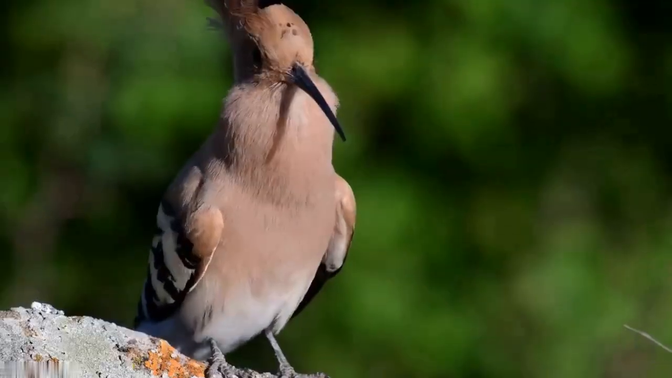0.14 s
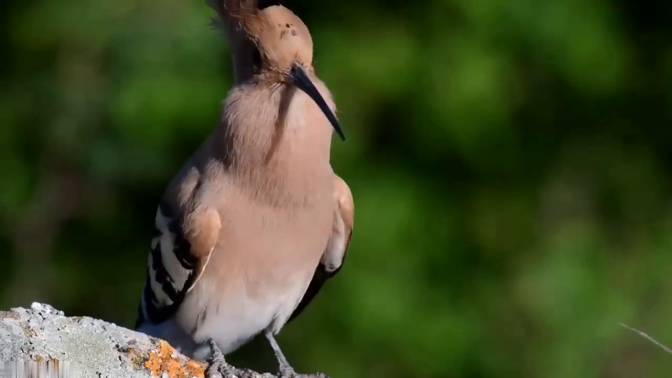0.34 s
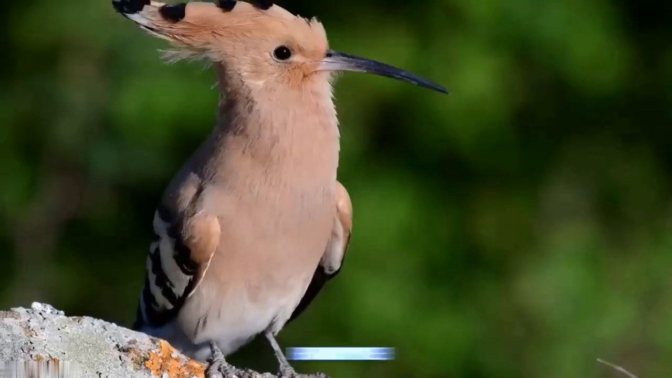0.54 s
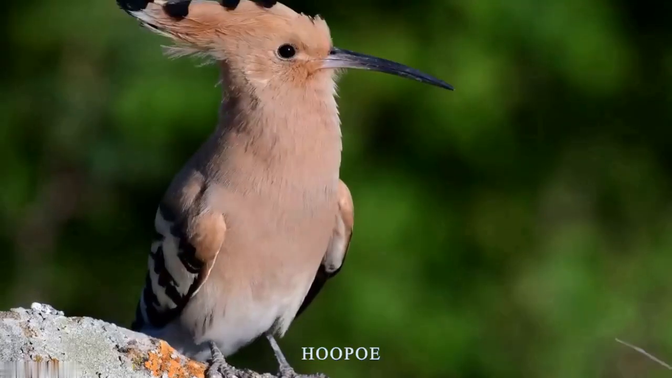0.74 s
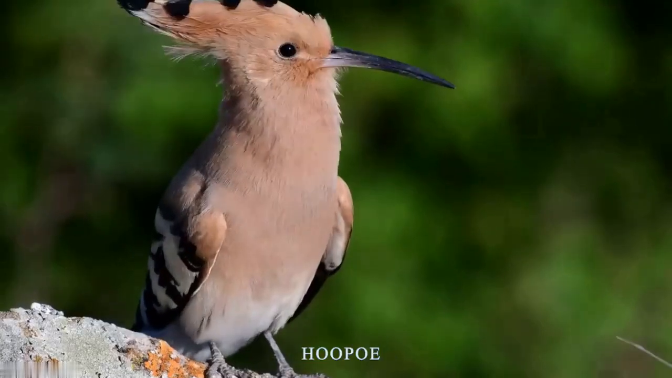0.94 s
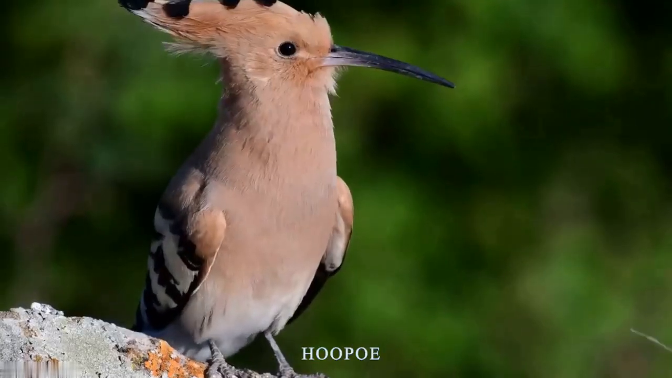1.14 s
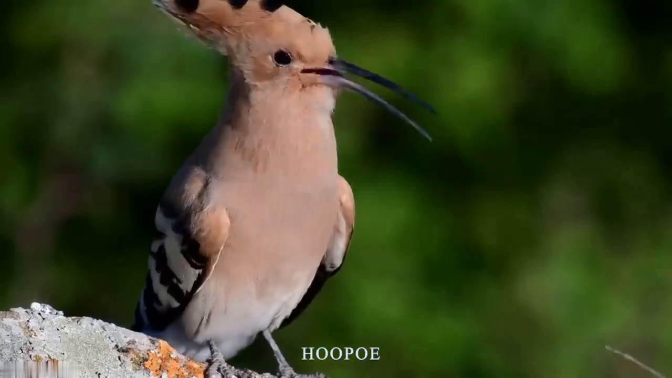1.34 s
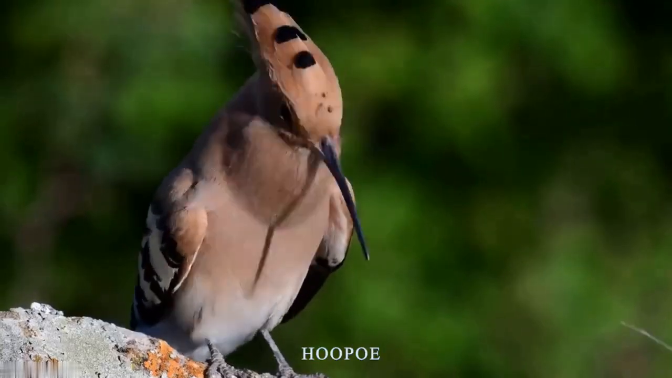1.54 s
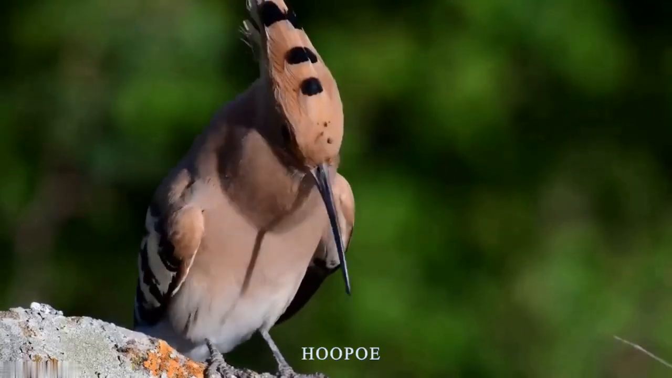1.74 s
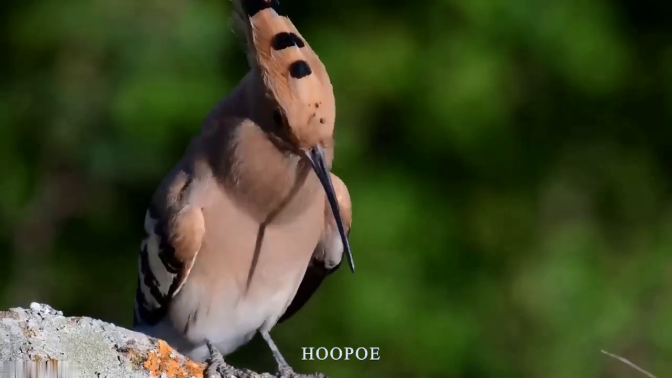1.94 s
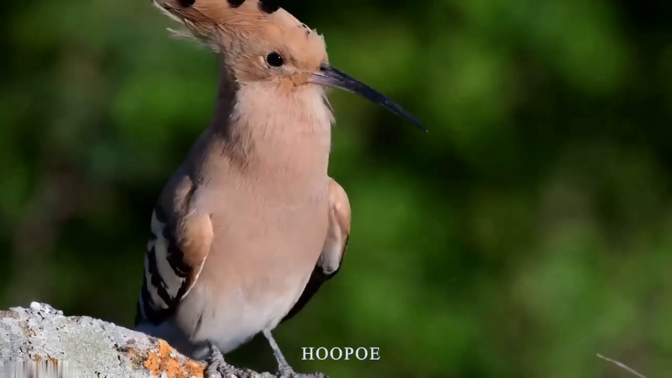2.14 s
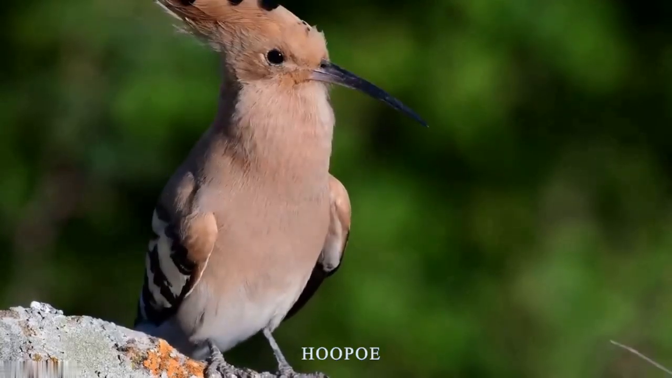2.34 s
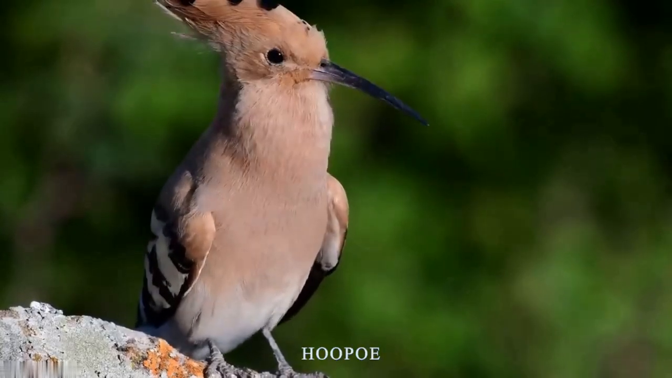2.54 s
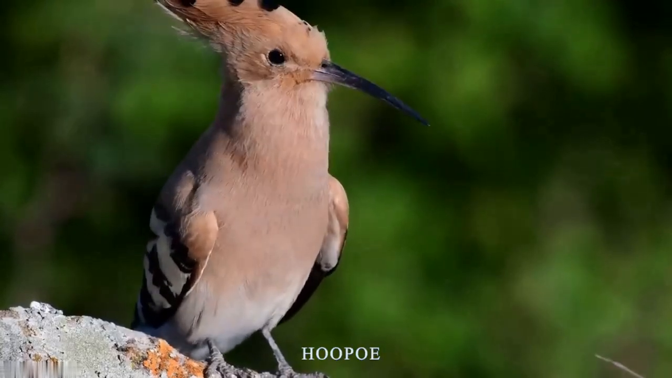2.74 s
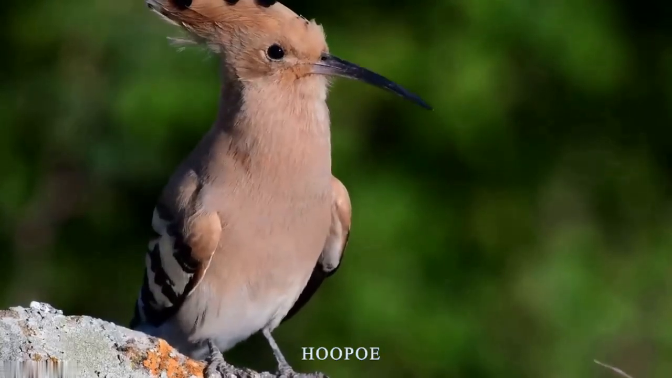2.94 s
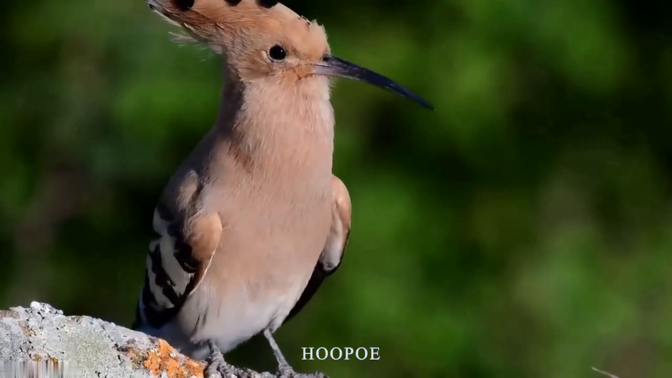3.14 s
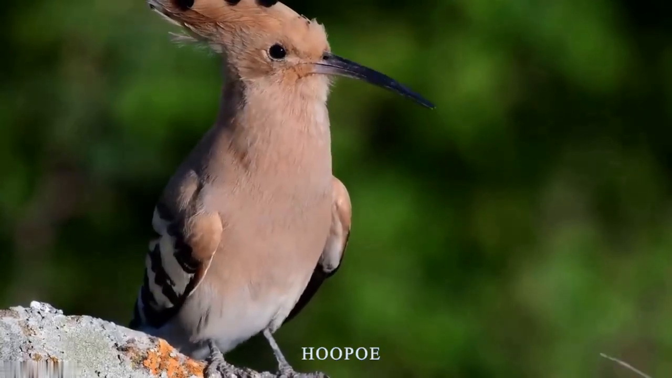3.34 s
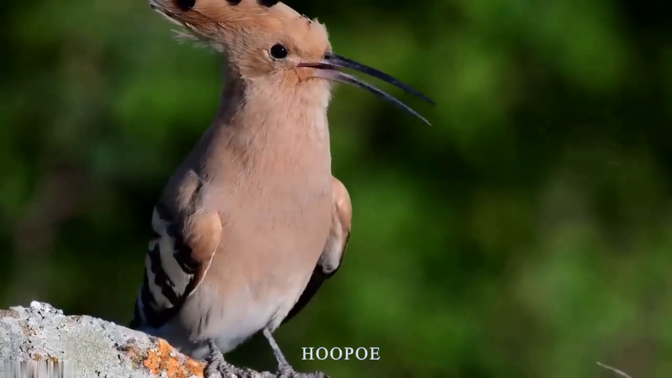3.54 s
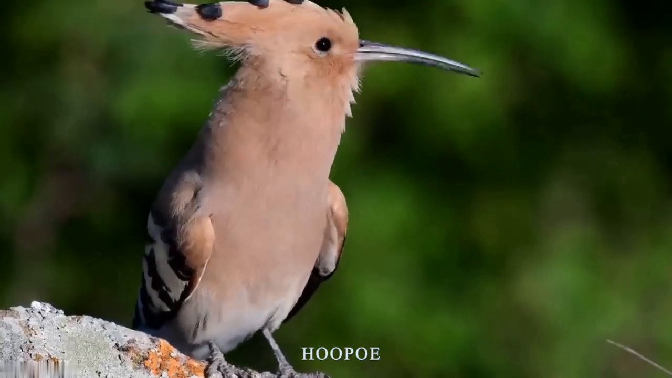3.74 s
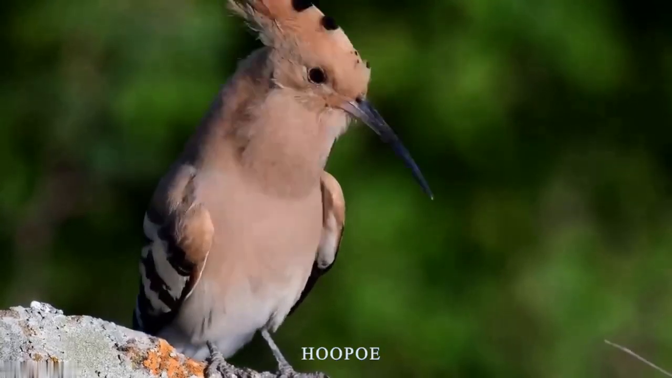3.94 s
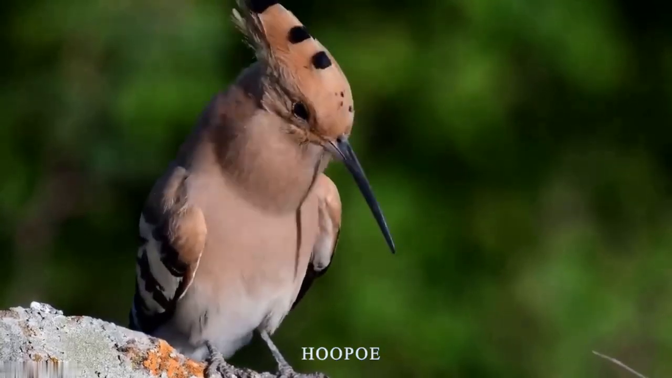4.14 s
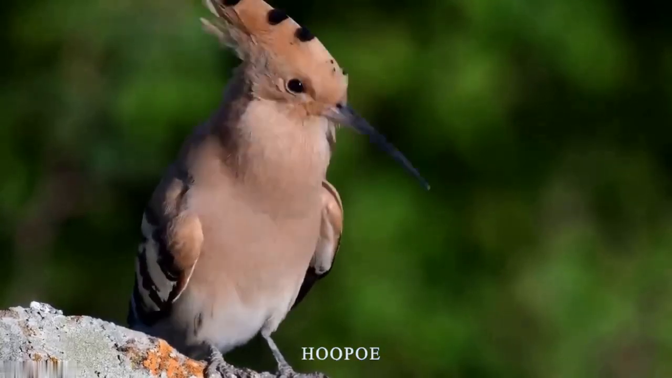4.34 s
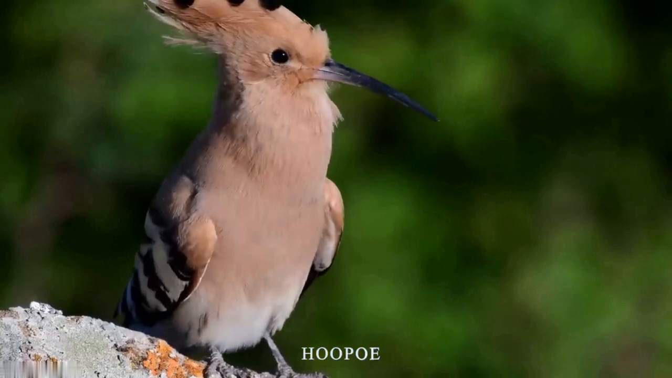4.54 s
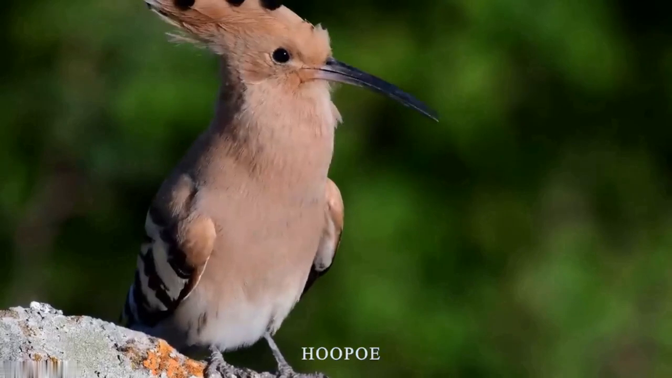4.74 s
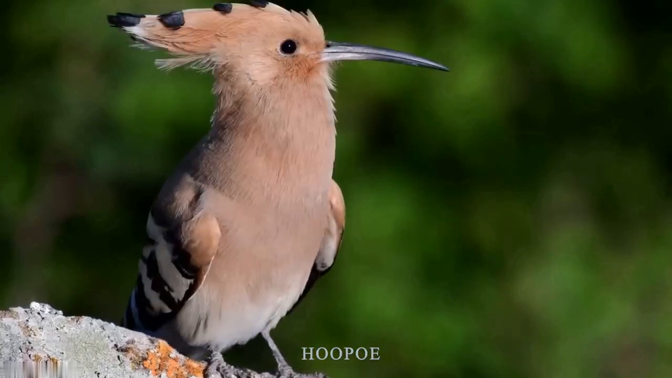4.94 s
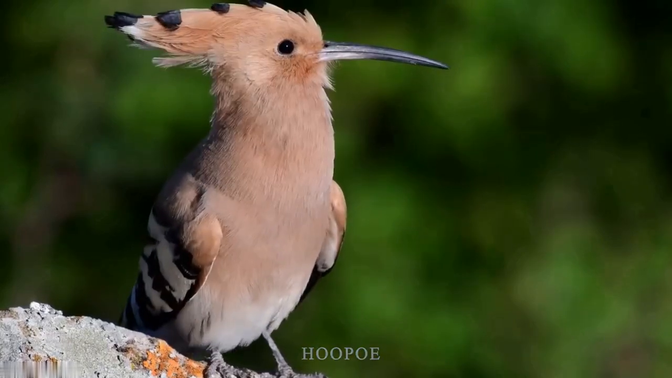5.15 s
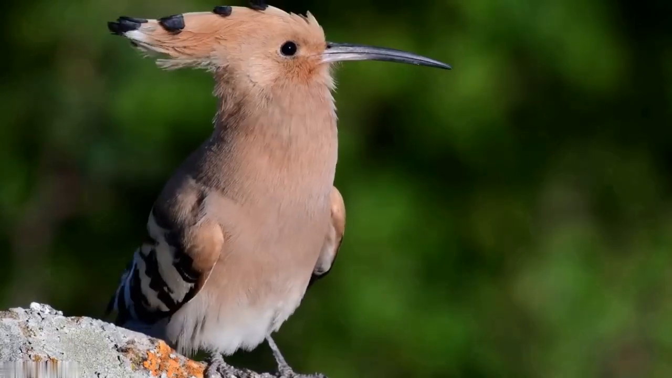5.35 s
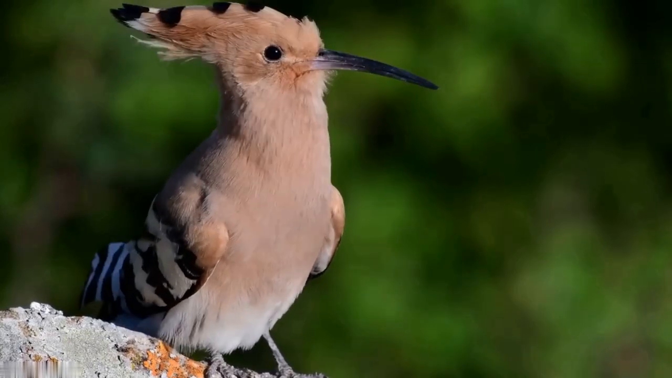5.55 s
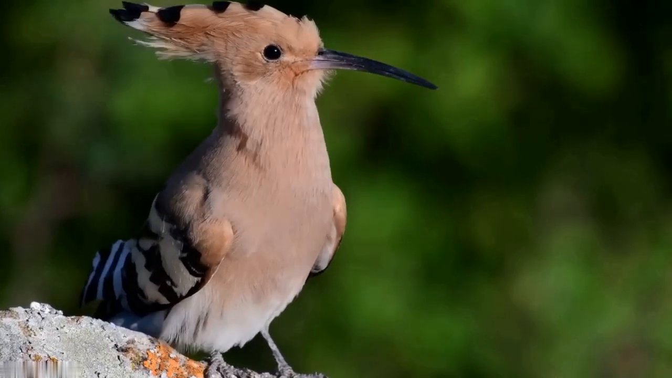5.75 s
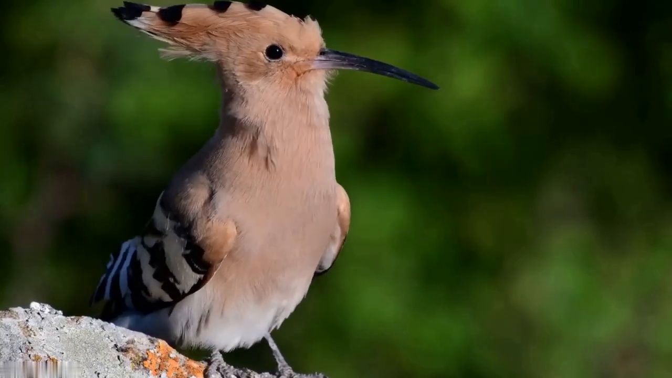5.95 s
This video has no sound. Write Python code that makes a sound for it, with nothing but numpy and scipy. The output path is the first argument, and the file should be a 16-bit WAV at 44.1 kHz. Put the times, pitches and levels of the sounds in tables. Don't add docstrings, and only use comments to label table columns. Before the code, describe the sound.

Quiet open country with scattered trees, heard in stereo. The tail of a hoot opens, then two triplets of soft hollow hoopoe calls follow, slightly right of centre, with very faint echoes. Thin cricket chirps repeat about three or four times a second throughout. A small bird chips weakly and another pipes far off. Just before the second triplet, handling noises tick, knock and creak near the microphone; low wind swells slightly towards the end.

```python
import sys
import numpy as np
from scipy import signal
from scipy.io import wavfile
from scipy.ndimage import uniform_filter1d

SR = 44100
rng = np.random.default_rng(int(sys.argv[2]) if len(sys.argv) > 2 else 0)


def to_wav(sig):
    pcm = np.clip(np.atleast_2d(sig), -1, 1) * 32767
    pcm = np.round(pcm).astype(np.int16)
    wavfile.write(sys.argv[1], SR, pcm.T)


def gain_from_db(level_db):
    decades = np.asarray(level_db, float) / 20
    return 10 ** decades


N = 268833
LEAD = 8820


def evened(x):
    return x / np.sqrt(np.mean(x ** 2) + 1e-20)


def read(points, hz):
    f, value = np.transpose(points)
    return np.interp(np.log(hz + 1), np.log(f + 1), value)


def add(mix, s, sound, pan_db=0., lag=0):
    for side, late, db in ((0, lag, pan_db / 2), (1, 0, -pan_db / 2)):
        part = mix[side, LEAD + round(s * SR) + late:][:len(sound)]
        part += gain_from_db(db) * sound[:len(part)]


def tone(hz):
    return np.sqrt(2) * np.sin(2 * np.pi * np.cumsum(hz) / SR)


def clock(ms):
    return np.arange(0, ms, 1000 / SR)


def band(x, low_hz, high_hz):
    return signal.sosfilt(signal.butter(N=3, Wn=[low_hz, high_hz], btype="band", fs=SR, output="sos"), x)


# multiple of the pitch, level in dB.
OVERTONES = [
    (2, -39),
    (3, -45.5),
]
GROW_DB = 4


def hoot(ms, db, early_hz, middle_hz, late_hz, swell, closing):
    t = clock(ms + 28) - 28
    end_hz = late_hz - 14 + min(late_hz - middle_hz, 0)
    hz = np.interp(t / ms, [.25, .6, .9, 1.0], [early_hz, middle_hz, late_hz, end_hz])
    hz = uniform_filter1d(hz, size=300) - 48 * np.exp(-np.maximum(t, -7) / 8)
    rise = 1 - np.exp(-(np.maximum(t + 14, 0) / (swell * 1.98)) ** 2.6)
    rise = rise + gain_from_db(-36.0) * np.exp(np.minimum(t, 0) / 14) * (1 - rise)
    fall = abs(1 - np.clip(1 - (ms - t) / closing, 0, 1) ** 2.53) ** 1.56
    level = rise * fall * gain_from_db(GROW_DB * (t / ms - 0.75))
    octave = level ** 0.3 * (1 + .8 * np.exp(-((ms - 14 - t) / 11) ** 2))
    third = rise ** .5 * np.clip((ms - t) / 35 - .3, 0, 1)
    over = sum(gain_from_db(o) * tone(k * hz) * shape for (k, o), shape in zip(OVERTONES, (octave, third)))
    over = over * gain_from_db(2.5 * np.interp(t, np.linspace(0, ms, 8), rng.standard_normal(8)))
    return gain_from_db(db) * (level * tone(hz) + over * np.clip(np.minimum(t, ms - 4 - t) / 7, 0, 1))


# start in seconds, length in ms, peak level in dB, pitch in Hz, early-to-late slide in Hz.
HOOTS = [
    (1.717, 98, -26, 661.4, -29),
    (1.913, 108, -25, 669.7, 12.5),
    (2.125, 104, -25, 667, 26),
    (3.988, 71.2, -29.5, 679.3, 6.5),
    (4.182, 104, -26.5, 654.2, -5),
    (4.391, 102, -27, 656, 14.5),
]
EARLIER = (-.0925, 101, -25, 664, 22)
# start in seconds, length in ms, level in dB, first Hz, last Hz.
CRACKS = [
    (4.056, 14.6, -36, 743, 734),
    (4.065, 21, -38, 708, 651),
]
ARCH_HZ = 4.3
SWELL_MS, SWELL_BY_LENGTH = 18.6, 0.85
OPEN_MS, CLOSING_SHARE = 54, 0.83


def hoopoe():
    out = np.zeros((2, N + LEAD))
    for s, ms, db, hz, slide_hz in [EARLIER, *HOOTS]:
        ends_hz = hz - ARCH_HZ
        swell = SWELL_MS * (ms / 100) ** SWELL_BY_LENGTH
        closing = CLOSING_SHARE * (ms - OPEN_MS)
        call = hoot(ms, db, ends_hz - slide_hz / 2, hz, ends_hz + slide_hz / 2, swell, closing)
        add(out, s - .028, call, -3.0, lag=1)
    for s, ms, db, from_hz, to_hz in CRACKS:
        hz = np.interp(clock(ms), [0, ms], [from_hz, to_hz])
        crack = tone(hz) + gain_from_db(-24.5) * tone(2 * hz)
        add(out, s, gain_from_db(db) * np.hanning(len(hz)) * crack, -1.2, lag=1)
    return out


# place from 0 to 1, length in ms, level in dB, Hz from the wing pitch.
STROKES = [
    (0, 12, -4.5, -86),
    (.262, 19, -0.5, -20),
    (.615, 19.5, -0.5, 6),
    (1, 19, -1, 7),
]


def chirp(s, span_ms, db, swell_db, pan_db, wing_hz, count=4):
    return [(s + place * span_ms / 1000, ms, db + step_db + swell_db * (place - .6), wing_hz + hz, pan_db)
            for place, ms, step_db, hz in STROKES[:count]]


# start in seconds, first to last stroke in ms, level in dB,
# swell in dB, left-right difference in dB.
NEAR_CHIRPS = [(0.118, 90, -55.5, 2.5, -10.5), (0.405, 88, -58.5, 3.5, -7), (.770, 91, -52.5, 1, -6),
               (1.081, 90, -59, 5, -6), (1.384, 90, -57, 0.5, -7), (1.667, 92, -55.5, -3, -5.5),
               (1.969, 92, -58, 2.5, -4), (2.261, 91, -54.5, 7, -5), (2.544, 88, -51, 0, -5),
               (2.822, 96, -52.5, 1, -6.5), (3.102, 89, -49, 3, -8), (3.377, 91, -49, -0.5, -8),
               (3.646, 88, -54.5, 2.5, -6.5), (3.912, 90, -52, 0, -7), (4.192, 89, -55, 0, -7.5),
               (4.479, 93, -62, 0.5, -10.5), (4.753, 91, -59, 14, -5), (5.047, 88, -48.5, 3, -6.5),
               (5.323, 93, -51, 1, -6.5), (5.61, 91, -51.5, 5, -8.5), (5.915, 92, -52.5, 0.5, -8)]
# start in seconds, ms for four strokes, level in dB, strokes.
FAR_CHIRPS = [(-.070, 87, -62, 4), (.176, 87, -61, 4), (.687, 210, -69, 4), (.918, 88, -64, 4),
              (1.233, 88, -68.5, 4), (1.452, 86, -65.5, 4), (1.948, 87, -69, 3), (2.172, 94, -66, 3),
              (2.458, 87, -65.5, 4), (2.695, 87, -64.5, 4), (2.965, 88, -64, 4), (3.200, 89, -65, 4),
              (3.470, 140, -69, 4), (3.730, 97, -75, 4), (3.955, 86, -72, 4), (4.408, 87, -67, 4),
              (4.704, 76, -67, 4), (4.934, 86, -68.5, 3), (5.238, 86, -61.5, 4), (5.484, 88, -64, 3),
              (5.705, 86, -62, 4)]
NEAR_HZ, FAR_HZ, FAR_PAN_DB, FAR_SWELL_DB = 4689, 4515, -5, 1.5
SCRAPE_DB = -21


def crickets():
    strokes = [row for near in NEAR_CHIRPS for row in chirp(*near, NEAR_HZ)]
    for s, pace_ms, db, many in FAR_CHIRPS:
        strokes += chirp(s, pace_ms, db, FAR_SWELL_DB, FAR_PAN_DB, FAR_HZ, count=round(many))
    out = np.zeros((2, N + LEAD))
    chance = rng.standard_normal((len(strokes), 24))
    rasps = gain_from_db(SCRAPE_DB) * evened(band(rng.standard_normal((len(strokes), 1500)), 5200, 8600))
    for (s, ms, db, hz, pan), c, rasp in zip(strokes, chance, rasps):
        u = (clock(ms + 4.6) + .01) / (ms + 5.6)
        sag_hz = 105 - 520 * u ** 2.8
        level_flutter = np.interp(u, np.linspace(0, 1, 12), c[:12])
        pitch_flutter = np.interp(u, np.linspace(0, 1, 12), c[12:])
        level = np.sin(np.pi * u ** 0.83) * gain_from_db(db - 0.7 + 1.8 * level_flutter)
        ring = tone(hz + sag_hz + 35 * pitch_flutter)
        add(out, s - .0025, level * (ring + rasp[:len(u)]), pan, lag=1)
    return out


# start in seconds, length in ms, level in dB, top Hz, bottom Hz.
CHIPS = [(0.676, 18, -63.5, 5840, 3850), (0.857, 38, -62, 6200, 4800), (0.874, 27, -62.5, 6480, 4000),
         (1.115, 16, -59, 5940, 4820), (1.88, 18, -56, 6720, 4740), (2.254, 25, -57, 6270, 4480),
         (3.602, 14, -54, 6670, 4130), (4.704, 10, -61.5, 6100, 4800), (5.03, 22, -59, 5800, 4100),
         (5.365, 30, -57, 6490, 4670)]
CHIP_PAN_DB = -7.5


def small_birds():
    out = np.zeros((2, N + LEAD))
    for s, ms, db, top_hz, bottom_hz in CHIPS:
        t, noise = clock(ms), rng.standard_normal((2, 2000))
        uneven = uniform_filter1d(noise[0], size=100)[:len(t)]
        turns = np.cumsum(330 * (1 + 0.85 * uneven)) / SR % 1
        centre = top_hz - (top_hz - bottom_hz) * (0.38 * turns + 0.27 * np.sin(np.pi * t / ms))
        breath = evened(band(noise[1], bottom_hz, top_hz))[-len(t):]
        buzz = tone(centre) * np.sin(np.pi * turns) + 1.41 * breath
        add(out, s, gain_from_db(db) * buzz * np.sin(np.pi * t / ms), CHIP_PAN_DB, lag=2)
    return out


# start in seconds, level in dB, speed factor, upper voice in Hz.
PIPES = [
    (.003, -48.5, 1.08, 2200),
    (0.662, -51, 1.08, 2110),
    (1.389, -52, 1.45, 2020),
    (2.52, -53.5, 1.1, 2050),
    (3.598, -56.5, 0.93, 2100),
    (5.474, -58, 1.2, 2050),
]
# time in ms, pitch in Hz, level in dB.
PIPE = [
    (0, 1570, -18),
    (10, 1670, -9),
    (22, 1775, 0),
    (28, 1810, 1),
    (35, 1850, -13),
    (45, 1810, 2),
    (51, 1760, -3),
    (59, 1640, -17),
]


def piper():
    out = np.zeros((2, N + LEAD))
    ms, hz, shape_db = np.transpose(PIPE)
    for s, db, speed, upper_hz in PIPES:
        t = clock(ms[-1] / speed) * speed
        lower = gain_from_db(db + np.interp(t, ms, shape_db)) * tone(np.interp(t, ms, hz))
        add(out, s, lower, -1.5, lag=9)
        upper = np.exp(-((t - 36) / 7.4) ** 2) * tone(upper_hz - 1.5 * (t - 36) ** 2)
        add(out, s, gain_from_db(db - 3.5) * upper, -6, lag=9)
    return out


# start in seconds, length in ms, level in dB, pitch in Hz.
CREAKS = [(3.757, 55, -57.5, 1930), (3.812, 27, -60.5, 1894), (3.962, 21, -65.5, 1970),
          (4.098, 44, -66, 1954), (4.151, 120, -73, 1960), (4.299, 28.4, -59.5, 1907),
          (4.335, 59, -64.5, 1937), (4.798, 7.4, -61.5, 1970), (4.818, 22, -72, 2030),
          (5.373, 17, -67.5, 1940)]
# start in seconds, length in ms, level in dB, low Hz, high Hz.
TICKS = [(0.132, 16, -55.5, 2600, 10800), (.33, 12, -64, 8200, 11000), (.46, 10, -67, 8200, 11500),
         (.5, 20, -60, 5500, 10700), (.795, 38, -62, 7800, 9900), (3.801, 25, -59.5, 60, 397),
         (3.809, 3.8, -54, 4500, 10800), (3.881, 34, -52, 49.6, 320), (3.885, 13, -50, 3550, 7700),
         (3.887, 23, -54.5, 1090, 1850), (3.894, 33, -59.5, 9400, 11000), (3.894, 15, -43, 4270, 7240),
         (3.935, 25, -63, 5600, 7400), (4.297, 98, -66.5, 2100, 3800), (4.874, 6, -56.5, 1710, 2500),
         (3.899, 3.3, -60, 11000, 15600), (4.871, 5, -53, 1490, 7430), (5.1, 12, -64, 4970, 8000)]
# low Hz, left-right difference in dB.
TICK_PAN = [(60, -19), (1700, -17.5), (4300, -1.5), (9000, 5)]
# start in seconds, level in dB, pitch in Hz, 60 dB decay in seconds.
KNOCKS = [
    (1.517, -52, 304, 0.023),
    (3.81, -48, 146, 0.018),
    (3.895, -68, 295, 0.019),
    (5.165, -52, 333, 0.042),
]


def handling():
    out = np.zeros((2, N + LEAD))
    for s, ms, db, hz in CREAKS:
        t, draw = clock(ms + 8), rng.random((3, 6000))
        slips = (draw[0] < 2600 / SR) * (draw[1] - .5) * gain_from_db(4.5 * draw[2])
        slips = slips[:len(t)] * (t < ms)
        bend = evened(uniform_filter1d(draw[1] - .5, size=160))[:len(t)]
        ring = np.convolve(slips, np.exp(-clock(12) / 1.9))[:len(t)] * tone(hz * (1 + .022 * bend))
        creak = evened(ring) + gain_from_db(-12.5) * evened(band(slips, 4200, 9000))
        add(out, s, gain_from_db(db) * creak * np.minimum(t / 4, 1) * np.exp(-t / ms * 0.6), -17)
    for s, ms, db, low_hz, high_hz in TICKS:
        t, pan = clock(ms), read(TICK_PAN, low_hz)
        for side in (-1, 1):
            crackle = rng.standard_normal(5000) * rng.exponential(1, 5000) ** .5
            puff = evened(band(crackle, low_hz, high_hz))[-len(t):]
            add(out, s, gain_from_db(db - 6.5) * puff * np.sin(np.pi * t / ms), pan + 8 * side)
    for s, db, hz, t60 in KNOCKS:
        t = clock(80) / 1000
        level = gain_from_db(db - 60 * t / t60) * (1 - np.exp(-t / 0.0037))
        add(out, s, level * 3 * np.sin(2 * np.pi * hz * t), -3)
    return out


# delay in seconds, level in dB, left-right difference in dB.
ECHOES = [
    (.029, -42.5, 1.5),
    (.052, -33, -3),
    (.078, -46, 1.5),
    (.146, -42.5, -2.5),
]


def trees(x, wet_db, tail_db):
    taps = np.zeros((2, SR // 2))
    grid = np.arange(300, SR // 2 - 40, 40)
    at = grid + rng.integers(0, 40, (2, len(grid)))
    decay = gain_from_db(-60 * at / SR / 0.6)
    np.put_along_axis(taps, at, rng.choice([-1., 1.], at.shape) * decay, 1)
    taps *= gain_from_db(tail_db) / np.linalg.norm(taps[0])
    for s, db, pan in ECHOES:
        taps[:, round(s * SR)] += gain_from_db(db + wet_db) * gain_from_db(np.array([pan, -pan]) / 2)
    return x + signal.fftconvolve(x.mean(0)[None], taps, axes=1)[:, :x.shape[1]]


# frequency in Hz, level in dB per Hz.
AIR = [(12, -35), (30, -12.5), (50, 0.5), (90, -1), (300, -7), (1000, -13.5), (2000, -18), (3500, -19.5),
       (5500, -19), (7000, -19), (9500, -20), (15700, -23.5)]
# frequency in Hz, coherence from 0 to 1.
SAME = [(30, 0.75), (60, 1), (140, 0.39), (330, 0.43), (770, 0.35), (1200, 0.015), (15000, 0.033)]
# time in seconds, level in dB.
GUSTS = [(0, 3), (1, -1), (2, -1), (3, -0.5), (4.2, 1.5), (4.8, 7), (5.4, 4.5), (6.1, 4)]
# multiple of its base pitch, level in dB.
WHINE = [(9, -91), (10, -99.5), (11, -102.5)]
AIR_DB, RUSTLE_DB, WHINE_HZ = -60, .8, 1170.3


def air():
    frames, hz = N // 256 + 5, np.fft.rfftfreq(1024, 1 / SR)
    a, b, c, d, patches = rng.standard_normal((frames, 513, 5)).T
    patches = evened(uniform_filter1d(uniform_filter1d(patches, size=14, axis=0), size=12, axis=1))
    t = np.arange(frames) * 256 / SR
    gust_db = np.interp(t, *np.transpose(GUSTS)) / (1 + (hz[:, None] / 90) ** 2)
    rustle = evened(uniform_filter1d(rng.standard_normal(frames), size=9))
    rustle_db = RUSTLE_DB * rustle * np.clip(hz[:, None] / 9000, 0, 1)
    same = np.clip(read(SAME, hz), -1, 1)[:, None]
    left = a + 1j * b
    right = same * left + np.sqrt(1 - same ** 2) * (c + 1j * d)
    z = np.array([left, right])
    z *= gain_from_db(read(AIR, hz)[:, None] + 0.99 * patches + rustle_db + gust_db)
    noise = signal.istft(z, nperseg=1024, noverlap=768)[1][:, :N]
    whine = sum(gain_from_db(db) * tone(np.full(N, k * WHINE_HZ)) for k, db in WHINE)
    return gain_from_db(AIR_DB) * evened(noise) + whine


def scene():
    near = trees(hoopoe(), -1, -34.5) + trees(crickets() + piper(), 10, -22)
    return (near + trees(small_birds(), 22, -10.5) + handling())[:, LEAD:] + air()


# lower edge in Hz, dB over the usual level that keeps the side.
JOINT = [(6250, -.8), (6900, .5), (8300, 1.4), (9600, 1.8), (11000, 2.3), (12400, 2.6), (13800, 2.4),
         (16000, 0)]
WEAK_DB = -5.9


def gated(x):
    hz, _, z = signal.stft([x[0] + x[1], x[0] - x[1]], SR, nperseg=2048, noverlap=1024, window="cosine")
    power = abs(z) ** 2
    usual = signal.medfilt(np.median(power, axis=2), [1, 101])[..., None]
    around = uniform_filter1d(uniform_filter1d(power, size=9, axis=1), size=2, axis=2)
    z *= (around > usual * gain_from_db(2 * WEAK_DB)) | (hz < 2000)[:, None]
    for (low_hz, keep_db), (high_hz, _) in zip(JOINT, JOINT[1:]):
        rows = (hz >= low_hz) & (hz < high_hz)
        level = power[1, rows].mean(0)
        z[1, rows] *= level > np.median(level) * gain_from_db(2 * keep_db)
    mid, side = signal.istft(z, SR, nperseg=2048, noverlap=1024, window="cosine")[1][:, :N] / 2
    return np.array([mid + side, mid - side])


def low_pass(x):
    return signal.sosfilt(signal.butter(12, 15840, fs=SR, output="sos"), x)


# frequency in Hz, width in Hz, share that passes unfiltered.
NOTCHES = [
    (2606, 466, .02),
    (7730, 950, 0.033),
]
EDGE_HZ = 15740


def record(dry):
    for hz, width, share in NOTCHES:
        notched = signal.lfilter(*signal.iirnotch(hz, hz / width, SR), dry)
        dry = share * dry + (1 - share) * notched
    edge = signal.firwin(801, EDGE_HZ, window=("kaiser", 10), fs=SR)
    mix = signal.oaconvolve(gated(dry), edge[None], "same")
    return low_pass(mix)


dry = scene()
out = record(dry)
to_wav(out)
```